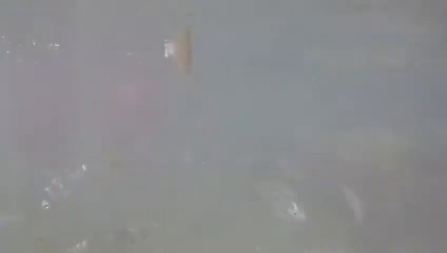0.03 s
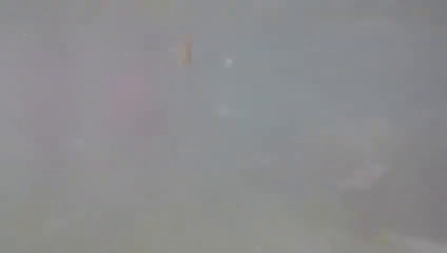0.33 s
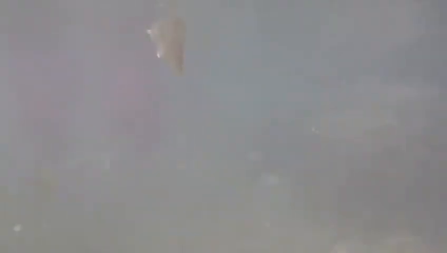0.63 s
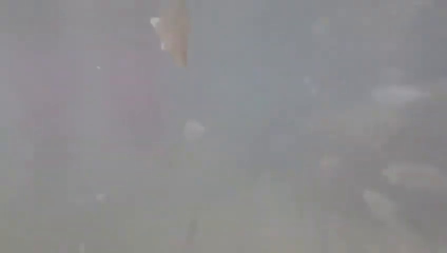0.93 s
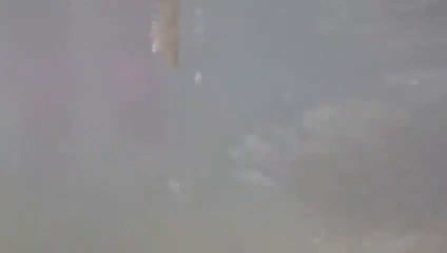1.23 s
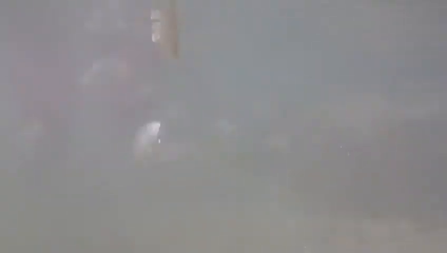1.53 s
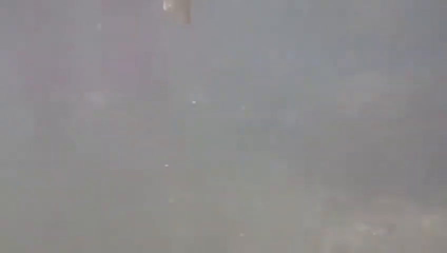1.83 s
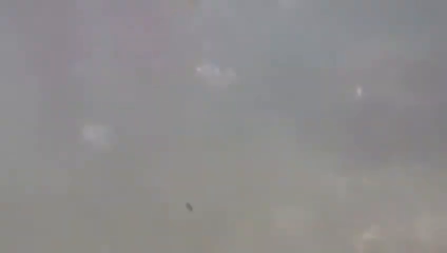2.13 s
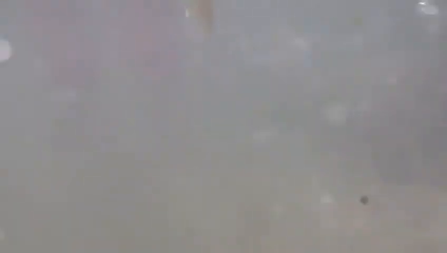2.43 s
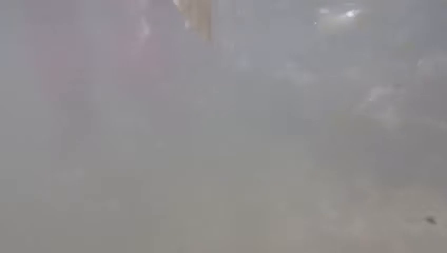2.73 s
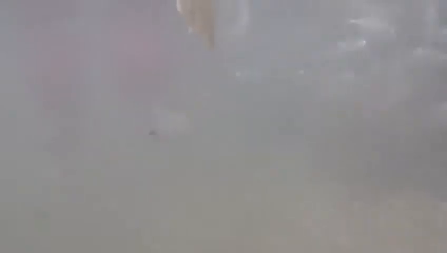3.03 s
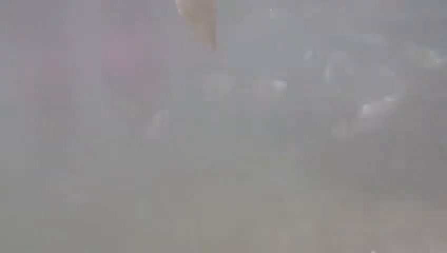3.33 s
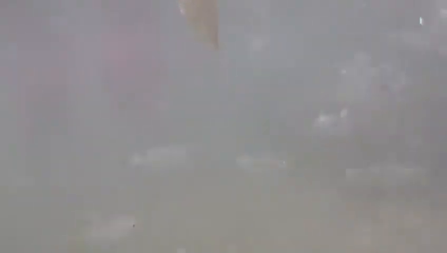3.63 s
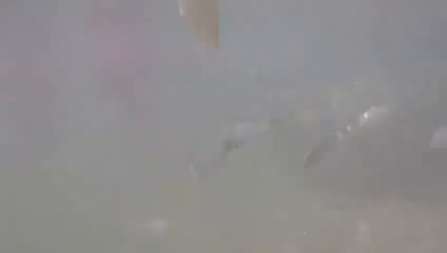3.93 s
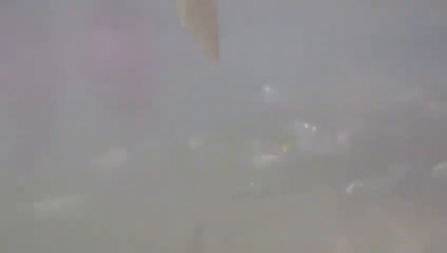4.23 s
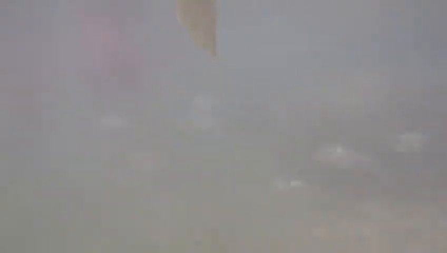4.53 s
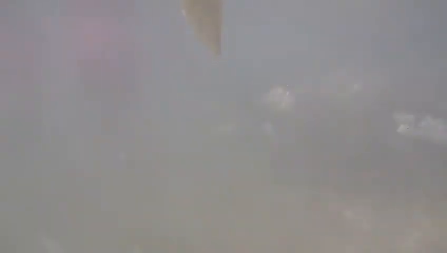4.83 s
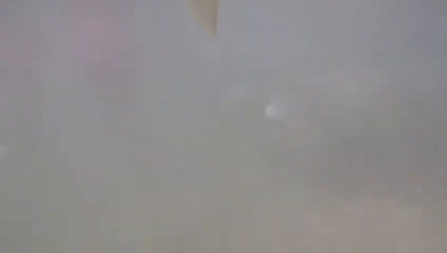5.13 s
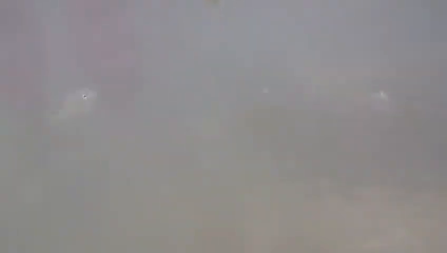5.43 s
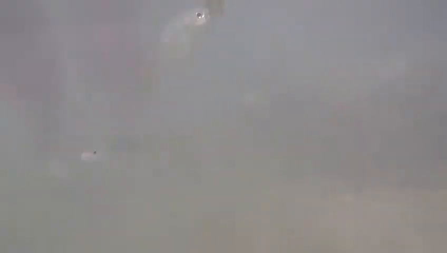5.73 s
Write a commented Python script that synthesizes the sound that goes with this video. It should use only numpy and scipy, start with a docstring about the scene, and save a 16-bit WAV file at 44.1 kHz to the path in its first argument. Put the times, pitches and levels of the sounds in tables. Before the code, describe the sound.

A camera in a waterproof case moves through shallow water, its sealed microphone picking up a low, lumpy rumble, a dull drone and faint hiss. Soft hand bumps, a few bubbles and tiny sharp snaps come and go. About two seconds in, fingers rub the plastic and knock it hard, and the sound briefly ducks. Afterwards a faint hum swells and fades amid quiet gurgling, light bumps and more snaps.

```python
"""A small camera in a waterproof case is carried through shallow water, its microphone sealed inside.
From the start, water pushes on the case, makes it drone and gurgles around it, over a faint hiss.
Soon the hand bumps the case; a few bubbles and sharp snaps, as of shrimp or grit, come and go.
Around two seconds the hand rubs and knocks, and the hardest blow makes the recorder turn itself down;
two thin, very short ticks of crackle follow. Later a faint hum swells and fades among bumps and snaps."""
import sys
import numpy as np
from scipy import signal
from scipy.fft import rfft, irfft
from scipy.io import wavfile
from scipy.ndimage import uniform_filter1d, minimum_filter1d

SR = 44100
rng = np.random.default_rng(int(sys.argv[2]) if len(sys.argv) > 2 else 0)


def dump(signal):
    """Clip the signal to [-1, 1] and save it as 16-bit WAV at the path in sys.argv[1]."""
    limited = np.clip(np.atleast_2d(signal).T, -1, 1)
    pcm = np.round(limited * 32767).astype(np.int16)
    wavfile.write(sys.argv[1], SR, pcm)


N = 264600
TIME = np.arange(N) / SR

# the notes the case rings at: (pitch [Hz], relative level [dB], time to fade by 60 dB [s])
CASE_NOTES = [(211.5, -0.5, 0.1), (249.7, 5, 0.057), (310, -7, 0.17), (362, -18, 0.029)]
# how much the water churns: (time [s], gurgle level [dB])
WATER_CHURN = [(0, -52.5), (1.3, -81), (2.6, -59.5), (2.95, -51.5), (3.7, -46), (4.75, -44), (5.15, -51.5),
               (5.35, -47.5), (5.65, -61), (6, -53.5)]


def from_db(db):
    """Turn decibels into a number to multiply by."""
    return 10 ** (np.asarray(db) / 20)


def rms_one(x):
    """Scale a sound so that its average strength (rms) is 1."""
    return x / np.sqrt(np.mean(x ** 2) + 1e-20)


def in_time(rows):
    """Join a table's points with straight lines, giving each column a value at every sample."""
    times, *columns = np.transpose(rows)
    return [np.interp(TIME, times, column) for column in columns]


def noise(colour):
    """Noise of strength 1; its colour table says how strong the low and high pitches are."""
    hz, db = np.transpose(colour)
    freqs = np.maximum(np.arange(N // 2 + 1) * SR / N, 1)
    shape = from_db(np.interp(np.log(freqs), np.log(hz), db))
    below = 1 + (hz.min() / freqs / np.sqrt(2)) ** 8
    above = 1 + (freqs / hz.max() / np.sqrt(2)) ** 8
    shape /= np.sqrt(below * above)   # fades beyond the table's ends
    return rms_one(irfft(rfft(rng.standard_normal(N)) * shape, N))


def drift(rate):
    """A random wobble of strength 1 that changes about `rate` times a second."""
    freqs = np.arange(N // 2 + 1) * SR / N
    return rms_one(irfft(rfft(rng.standard_normal(N)) / (1 + (freqs / rate) ** 2), N))


def evened(x, span_s):
    """Hold a noise at strength 1 over stretches longer than the span."""
    power = uniform_filter1d(np.abs(signal.hilbert(x)) ** 2, max(int(span_s * SR), 1))
    return rms_one(x / np.sqrt(power + 1e-9))


def resonance(x, hz, width_hz):
    """Make a sound ring at one pitch; the narrower the width, the longer it rings."""
    r = np.exp(-np.pi * width_hz / SR)
    feedback = [1, -2 * r * np.cos(2 * np.pi * hz / SR), r * r]
    return signal.lfilter(np.array([1, 0, -1]) * (1 - r * r) / 2, feedback, x)


def band(x, centre_hz, width_hz):
    """Keep only the pitches near the centre."""
    edges = np.clip([centre_hz - width_hz / 2, centre_hz + width_hz / 2], 100, .45 * SR)
    return signal.sosfilt(signal.butter(3, edges, "band", fs=SR, output="sos"), x)


def around(when):
    """The samples within a quarter second of a moment, and their times counted from it."""
    near = np.flatnonzero(np.abs(TIME - when) < .25)
    return near, TIME[near] - when


def struck(t, rise_s, fade_s):
    """The loudness of a hit: it rises smoothly until t = 0, then drops 60 dB every fade_s."""
    rise = np.exp(-(np.minimum(t, 0) / rise_s) ** 2)
    return rise * from_db(-60 * np.maximum(t, 0) / fade_s)


def buffeting():
    """Swirls of water push on the case in slow, lumpy waves."""
    # the water's push: (time [s], level [dB])
    push_levels = [(0, -22), (.45, -21.5), (.63, -27), (.8, -18.5), (1.2, -16), (1.65, -15), (2.05, -9.5),
                   (2.2, -13.5), (2.4, -19.5), (2.75, -34.5), (3.0, -32), (4.0, -32.5), (4.2, -25),
                   (4.7, -34), (5.55, -30), (5.72, -22.5), (6, -21)]
    # its deep rumble: (pitch [Hz], relative level [dB])
    push_colour = [(12, -1.5), (22, 9.5), (32, 8.5), (45, -2.5), (65, -5.5), (100, -18), (150, -19.5),
                   (300, -69)]
    level_db, = in_time(push_levels)
    return from_db(level_db) * evened(noise(push_colour), span_s=.12)


def case_drone():
    """Water sliding past makes the case drone: a dull rumble, its lowest note and the air inside."""
    # the drone from the sliding water: (time [s], level [dB])
    drone_levels = [(0, -41.5), (.6, -38), (1.0, -36.5), (2.15, -33), (2.4, -32), (2.8, -47.5), (3.1, -37),
                    (3.9, -37.5), (4.6, -33), (5.55, -39), (6, -34)]
    # its dull rumble: (pitch [Hz], relative level [dB])
    rumble_colour = [(45, 1.5), (80, 4), (120, 3.5), (170, 0.5), (240, 3), (320, -9.5), (420, -26),
                     (560, -27), (800, -34.5)]
    # the air's note shifts with the grip: (time [s], pitch [Hz], relative level [dB])
    air_notes = [(0, 256, -6.5), (1.1, 282.6, 3), (2.4, 298, -8.5), (3.1, 326.2, -6.5), (3.8, 336.6, -5),
                 (4.4, 368, -4.5), (5.1, 340.8, -6.5), (5.7, 255.7, -2), (6, 295.4, 5.5)]
    drone_db, = in_time(drone_levels)
    air_hz, air_db = in_time(air_notes)
    rumble = from_db(-0.24 + 2.76 * drift(13.3)) * evened(noise(rumble_colour), span_s=0.45)
    shell = evened(resonance(rng.standard_normal(N), CASE_NOTES[0][0], width_hz=14.0), span_s=0.41)
    phase = 2 * np.pi * np.cumsum(air_hz) / SR
    air = evened(drift(18) * np.cos(phase) + drift(22.0) * np.sin(phase), span_s=0.3)   # a wavering note
    return from_db(drone_db) * (rumble + from_db(-7.5) * shell + from_db(air_db - 6.0) * air)


def far_wash(usual_db=-52, churn_share=0.12):
    """Water moving further off, muffled by the case; it swells a little with the churn."""
    # the muffled water: (pitch [Hz], relative level [dB])
    wash_colour = [(250, -10), (400, 11.5), (550, 7.5), (750, 2), (1100, -0.5), (1600, -3), (2300, -9),
                   (3200, -20.5), (4300, -19.5), (7000, -26.5), (11000, -42)]
    churn_db, = in_time(WATER_CHURN)
    swell_db = churn_share * (churn_db - churn_db.mean())
    return from_db(usual_db + swell_db + 0.52 * drift(28)) * noise(wash_colour)


def gurgle(bubbles_per_s=170, cycles=9, pitch_count=14):
    """Many small bubbles ring at random, the higher ones fainter; the case softens their starts."""
    level_db, = in_time(WATER_CHURN)
    out = np.zeros(N)
    for hz in np.geomspace(340, 640, pitch_count):
        born = rng.random(N) < bubbles_per_s / pitch_count / SR
        kicks = from_db(rng.uniform(-9.5, 0, N)) * rng.choice([-1, 1], N)
        out += (340 / hz) ** 4.7 * resonance(born * kicks + 1e-18, hz, width_hz=hz / cycles)
    return from_db(level_db) * rms_one(band(out, centre_hz=474, width_hz=500))


def hiss():
    """The microphone makes a faint noise of its own."""
    # how loud the hiss is: (time [s], level [dB])
    hiss_levels = [(0, -66), (.9, -62), (2.2, -59.5), (2.55, -78.5), (3.3, -69), (5.25, -68), (6, -62.5)]
    # its thin, high sound: (pitch [Hz], relative level [dB])
    hiss_colour = [(2000, -27), (3500, -19), (5300, 1.5), (7000, -1), (8000, 4), (8900, 8), (10000, 6),
                   (11000, -14.5)]
    level_db, = in_time(hiss_levels)
    return from_db(level_db) * noise(hiss_colour)


def hand_bumps(best_ring_hz=131, fall_db_per_octave=12.5):
    """A soft blow squeezes the case in one swing and leaves it ringing, most near best_ring_hz."""
    # the hand's blows: (time [s], relative level [dB], pitch of the swing [Hz])
    blows = [(0.231, -15.5, 50), (0.525, -6.5, 26.8), (.858, -7, 37.6), (1.03, -25, 150),
             (1.38, -5.5, 33.2), (1.725, -8.5, 82), (1.738, -15, 180), (1.753, -10, 44), (1.928, -2, 127),
             (1.938, -7, 284), (2.095, -10.5, 243), (2.138, -7, 90), (2.172, -2, 91), (2.18, 11.5, 223),
             (2.28, 7, 101), (2.299, -3, 45), (3.105, -15, 86), (3.653, -10, 143.5), (4.054, -19.5, 56),
             (4.19, -13.5, 97), (4.407, -23.5, 89.5), (4.578, -18.5, 130), (4.88, -18, 21.7),
             (5.786, -7, 61), (5.849, -16, 76)]
    out = np.zeros(N)
    for when, db, hz in blows:
        near, t = around(when)
        swing = -np.sin(2 * np.pi * hz * t) / np.cosh(t * hz / 0.29)
        ring = np.zeros(len(t))
        for note_hz, note_db, fade_s in CASE_NOTES:
            strength = from_db(note_db - 14 + 2 * rng.standard_normal())
            ring += strength * np.sin(2 * np.pi * note_hz * t) * struck(t, 0.0021, fade_s)
        ring_db = -fall_db_per_octave * abs(np.log2(hz / best_ring_hz))
        out[near] += from_db(db) * (swing + from_db(ring_db) * ring)
    return out


def snaps_and_ticks(rise_s=0.0007, ring_db=-2, fall_db_per_octave=5, tail_db=-19.5, tail_stretch=5.3):
    """Short bursts of ringing noise, each with one pitch above the rest and a faint, longer tail."""
    # The rows at 2.2813 and 2.299 s are two thin, very short ticks of crackle just after the hardest
    # blow; the others are snaps in the water that ring the case wall.
    # (time [s], relative level [dB], strongest pitch [Hz], time to fade by 60 dB [s])
    clicks = [(.283, -47, 3200, 0.026), (1.007, -41.5, 2860, .02), (1.131, -45, 5400, .009),
              (1.2015, -28.5, 5200, 0.0037), (2.0911, -25.5, 5050, 0.0041), (2.2813, -24.5, 6570, 0.0021),
              (2.299, -27, 7000, .003), (2.426, -44, 2900, .019), (2.547, -44, 4800, 0.022),
              (2.622, -42, 3700, .012), (2.7122, -24.5, 3020, 0.013), (3.0233, -38.5, 3120, .02),
              (3.0495, -37, 3180, .02), (3.2455, -43, 9000, .015), (3.39, -40.5, 2850, .023),
              (4.0541, -30, 5940, 0.012), (4.223, -35.5, 5800, 0.014), (4.223, -37.5, 8960, .012),
              (4.579, -28, 2930, 0.032), (5.0342, -33, 6060, .022), (5.038, -48, 6250, 0.077),
              (5.3808, -30, 3050, 0.031), (5.388, -39, 2800, 0.018), (5.403, -39, 9000, .013),
              (5.7263, -27.5, 8600, 0.011), (5.8423, -28.5, 4850, 0.011), (5.9545, -37, 3400, .012)]
    # the high notes in each click: (pitch [Hz], width [Hz], relative level [dB])
    ring_notes = [(1650, 500, -19), (2690, 630, -24), (3220, 850, 9), (4710, 130, 8), (5450, 1100, -2),
                  (7800, 2200, 3), (9300, 580, 6)]
    out = np.zeros(N)
    for when, db, hz, fade_s in clicks:
        near, t = around(when)
        main_noise, ring_noise = rng.standard_normal((2, len(t)))
        ring = np.zeros(len(t))
        for k, (note_hz, width_hz, note_db) in enumerate(ring_notes):
            # notes far from the click's pitch ring less
            strength = from_db(note_db - fall_db_per_octave * abs(np.log2(note_hz / hz)))
            ring += (-1) ** k * strength * resonance(ring_noise, note_hz, width_hz)
        main = evened(band(main_noise, hz, width_hz=990), span_s=0.0019)
        crack = rms_one(main + from_db(ring_db) * evened(ring, span_s=0.0075))
        tail = from_db(tail_db) * struck(t, rise_s, tail_stretch * fade_s)
        out[near] += from_db(db - 9.5) * crack * (struck(t, rise_s, fade_s) + tail)
    return out


def bubbles(fade_cycles=31.3, pitch_rise=0.043):
    """A bubble rings briefly, rising a little in pitch; low ones ring longer."""
    # single bubbles: (time [s], peak level [dB], pitch [Hz])
    plops = [(.315, -38, 494), (.575, -38, 486), (1.094, -28, 440), (2.242, -19.5, 313), (2.245, -35, 575),
             (2.37, -41, 590), (2.388, -21.5, 272), (2.543, -20.5, 326), (3.194, -38, 570),
             (4.223, -36, 540), (4.401, -30, 410), (4.825, -36, 545), (5.291, -32.5, 377), (5.67, -35, 407),
             (5.904, -38.5, 520), (5.946, -29, 431), (5.975, -29.5, 454)]
    out = np.zeros(N)
    for when, db, hz in plops:
        near, t = around(when)
        fade_s = fade_cycles / hz
        tone = np.sin(2 * np.pi * hz * t * (1 + pitch_rise * t / fade_s))
        out[near] += from_db(db) * tone * struck(t, 0.0025, fade_s)
    return out


def finger_rubs():
    """Skin sticks and slips on the plastic: a low shudder with a fine, even scratch on top."""
    # finger drags: (time [s], half length [s], shudder level [dB], scratch level [dB])
    drags = [(1.755, 0.016, -22, -48), (1.852, 0.024, -28, -64), (1.906, 0.0054, -15.5, -58),
             (1.924, 0.0086, -17.5, -45.5), (1.943, 0.0085, -14.5, -38), (2.137, 0.003, -32, -46),
             (2.177, 0.0023, -20, -53), (2.183, 0.0068, -4.5, -54), (2.277, .014, -16, -45.5)]
    # the low shudder: (pitch [Hz], relative level [dB])
    shudder_colour = [(100, -2.5), (180, 3.5), (250, 8), (310, 8.5), (380, -8.5), (500, -16.5),
                      (800, -29.5), (1400, -41), (2500, -58)]
    # the fine scratch: (pitch [Hz], relative level [dB])
    scratch_colour = [(500, -3), (900, 12), (1250, -1), (1650, 5.5), (2050, -4.5), (2900, 1.5), (3500, -4),
                      (4000, -2.5), (4350, -6), (5000, -1.5), (6600, -14.5), (8300, -7), (11000, -29)]
    shudder = evened(noise(shudder_colour), span_s=0.012)
    scratch = evened(noise(scratch_colour), span_s=.002)
    out = np.zeros(N)
    for when, half_s, shudder_db, scratch_db in drags:
        near, t = around(when)
        swell = np.exp(-(t / half_s) ** 2 / 2)
        out[near] += swell * (from_db(shudder_db) * shudder[near] + from_db(scratch_db) * scratch[near])
    return out


def knocks():
    """Something hard meets the case with a short, dull crack."""
    # hard hits: (time [s], level [dB])
    hits = [(2.0915, -25), (2.1794, -16)]
    # their dull crack: (pitch [Hz], relative level [dB])
    crack_colour = [(350, 8.5), (550, 8), (1000, 3.5), (1250, -2.5), (1700, -2), (2400, -22), (3600, -20.5),
                    (9000, -30)]
    crack = evened(noise(crack_colour), span_s=0.0039)
    out = np.zeros(N)
    for when, db in hits:
        near, t = around(when)
        out[near] += from_db(db) * crack[near] * struck(t, rise_s=0.00044, fade_s=.016)
    return out


def gain_control(x, limit_db=-1.5, react_s=0.0014, hold_s=0.41, recover_db_per_s=32.5):
    """A peak over the limit makes the recorder turn down at once, wait, then creep back up."""
    over_db = np.maximum(20 * np.log10(np.abs(x) + 1e-9) - limit_db, 0)
    hold = int(hold_s * SR)
    # the biggest overshoot within the last hold_s
    held_db = -minimum_filter1d(-over_db, hold, origin=(hold - 1) // 2, mode="constant")
    recovery_db = recover_db_per_s * TIME
    cut_db = np.maximum.accumulate(held_db + recovery_db, axis=-1) - recovery_db
    return x * from_db(-uniform_filter1d(cut_db, int(react_s * SR)))


def hum():
    """The case hums faintly at a nearly steady pitch."""
    # how loud the hum is: (time [s], level [dB])
    hum_levels = [(2.6, -60), (3.05, -43.5), (3.8, -38.5), (4.3, -51.5), (5.25, -52.5), (5.6, -69)]
    level_db, = in_time(hum_levels)
    tone = resonance(rng.standard_normal(N), hz=333.8, width_hz=5.6)
    return from_db(level_db) * evened(tone, span_s=0.11)


def scene():
    """All the sounds add up in one channel, as heard inside the case."""
    background = buffeting() + case_drone() + hum() + gurgle() + far_wash()
    handling = hand_bumps() + finger_rubs() + knocks()
    return (background + handling + snaps_and_ticks() + bubbles() + hiss())[None]


def record(dry, cutoff_hz=10700):
    """The recorder turns down after the hardest blow, adds faint noise, rounds peaks and cuts treble."""
    # the recorder's own noise, never turned down: (pitch [Hz], relative level [dB])
    floor_colour = [(1500, 1), (3000, 2), (5500, 1), (10000, -14.5)]
    x = gain_control(dry) + from_db(-74) * noise(floor_colour)
    rounded = x / (1 + x ** 6) ** (1 / 6)
    return signal.sosfilt(signal.ellip(10, .1, 70, cutoff_hz, fs=SR, output="sos"), rounded)


dry = scene()
out = record(dry)
dump(out)
```